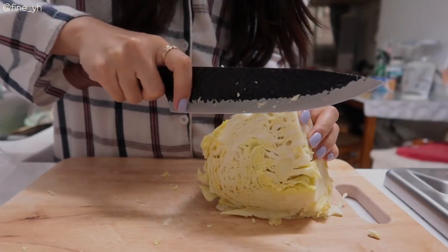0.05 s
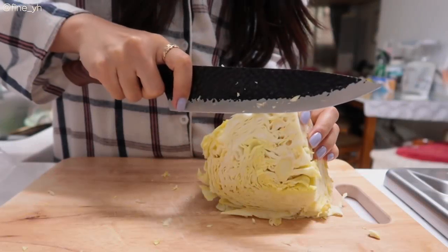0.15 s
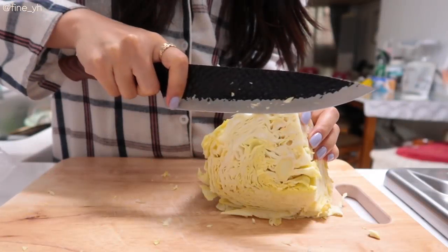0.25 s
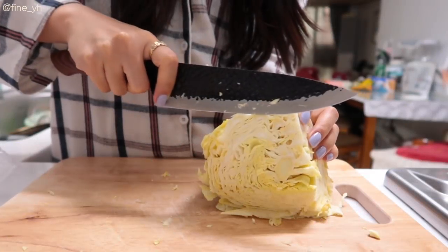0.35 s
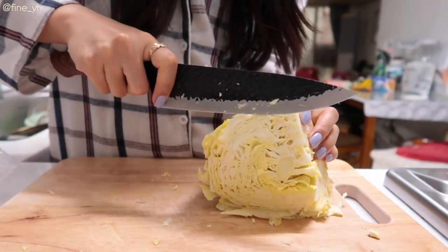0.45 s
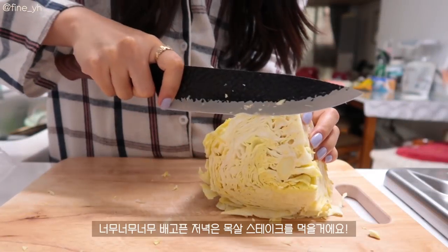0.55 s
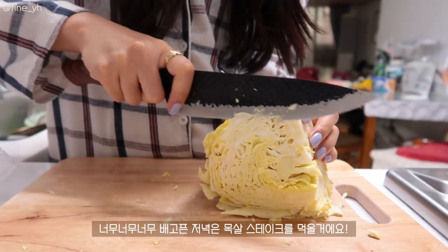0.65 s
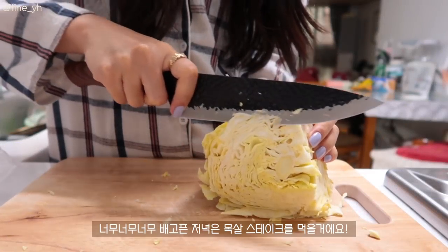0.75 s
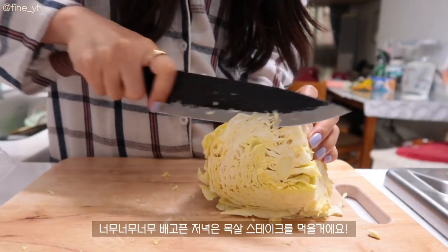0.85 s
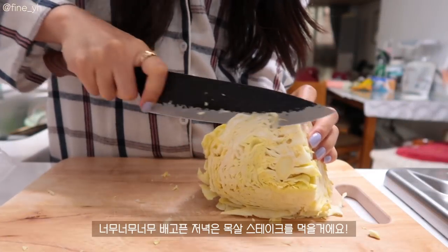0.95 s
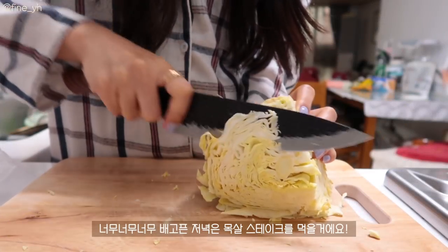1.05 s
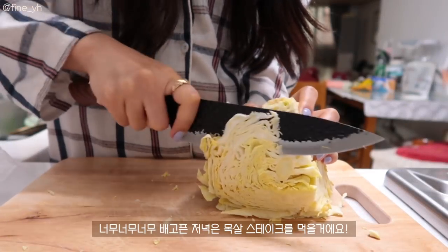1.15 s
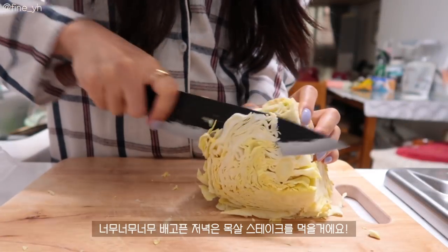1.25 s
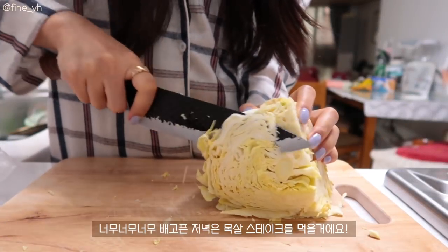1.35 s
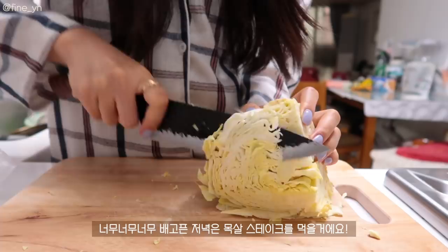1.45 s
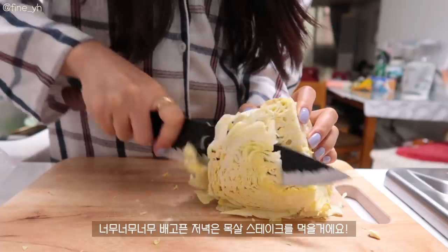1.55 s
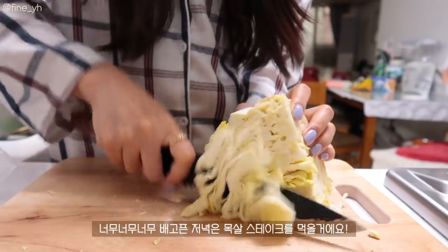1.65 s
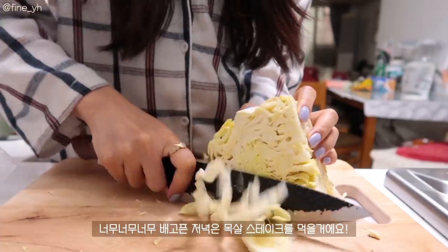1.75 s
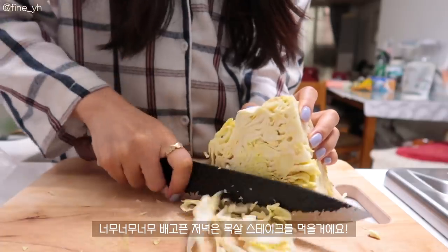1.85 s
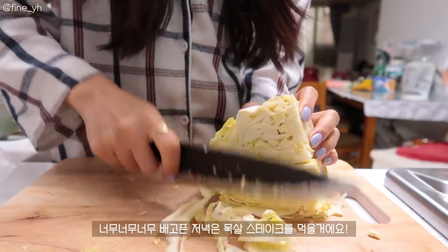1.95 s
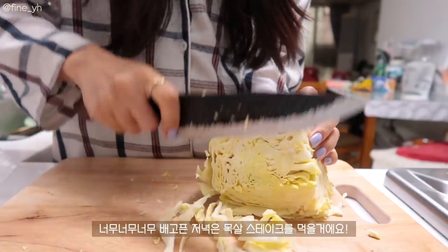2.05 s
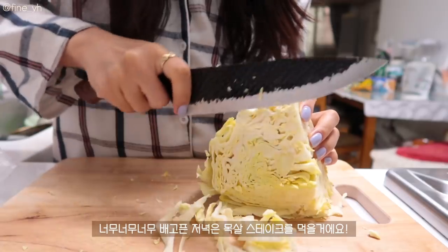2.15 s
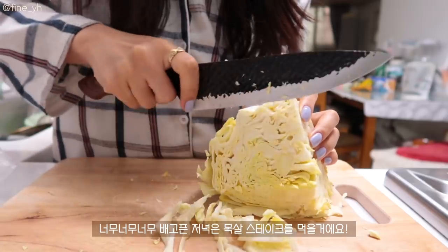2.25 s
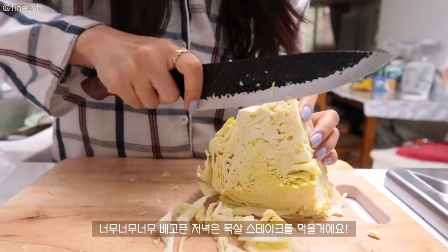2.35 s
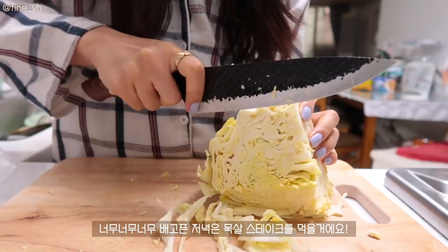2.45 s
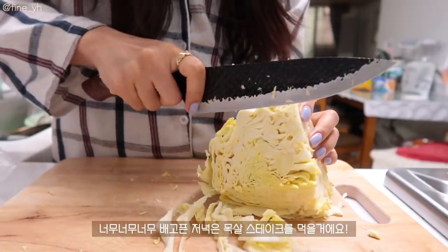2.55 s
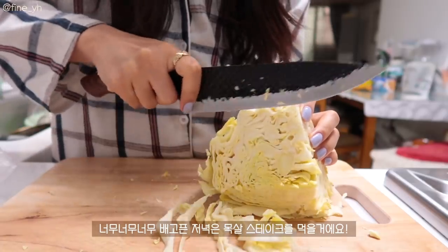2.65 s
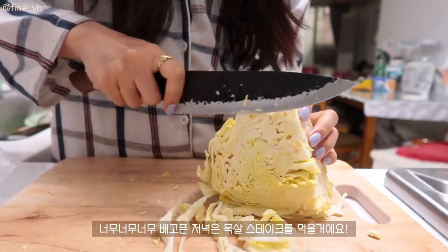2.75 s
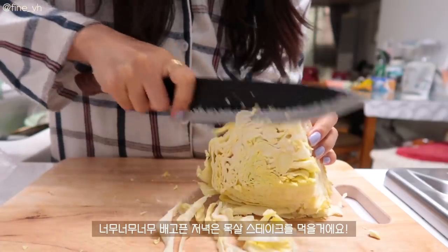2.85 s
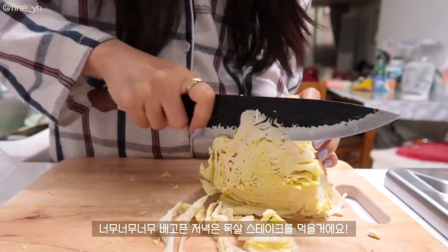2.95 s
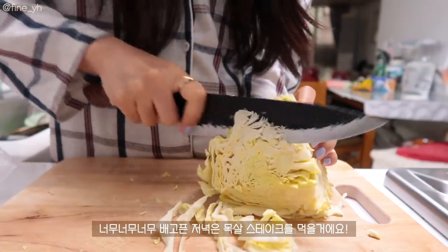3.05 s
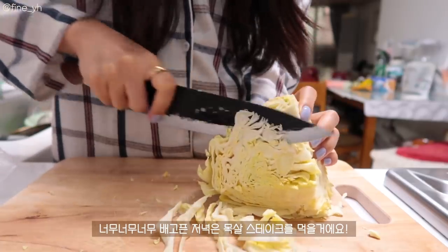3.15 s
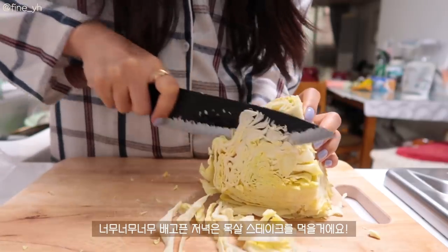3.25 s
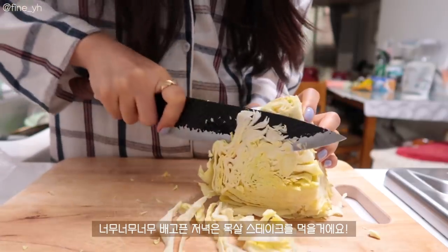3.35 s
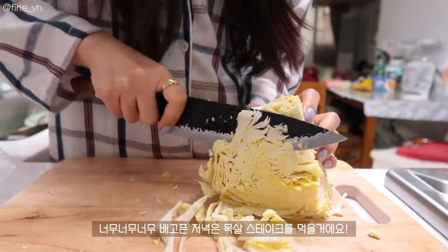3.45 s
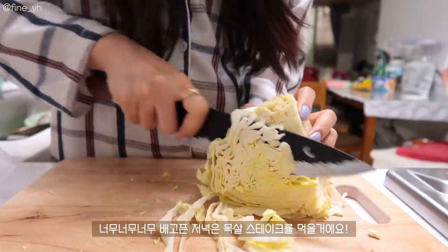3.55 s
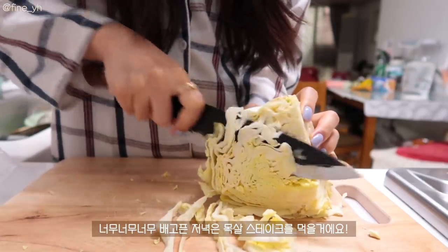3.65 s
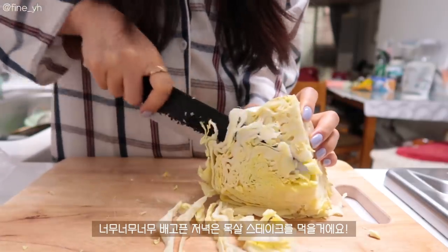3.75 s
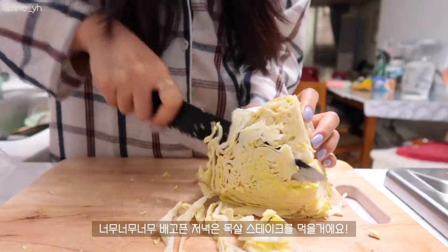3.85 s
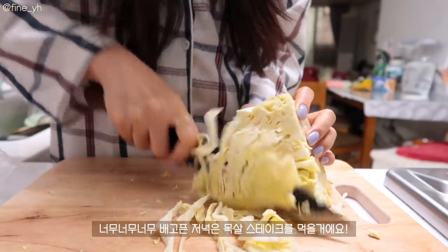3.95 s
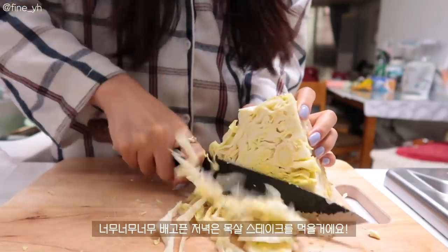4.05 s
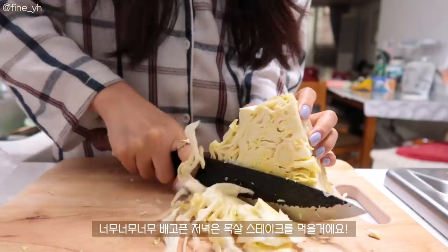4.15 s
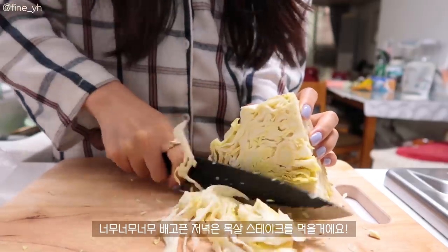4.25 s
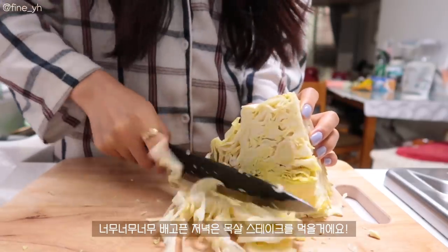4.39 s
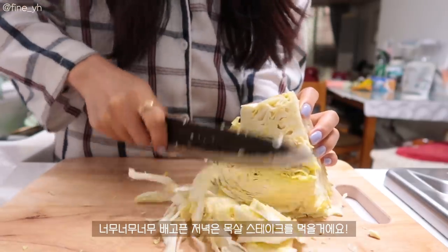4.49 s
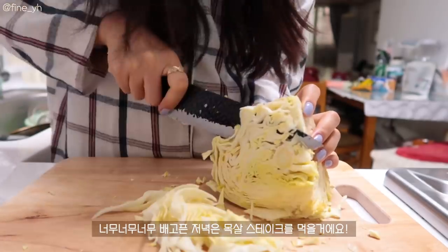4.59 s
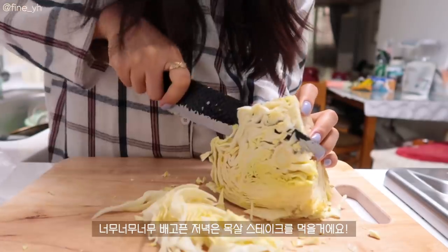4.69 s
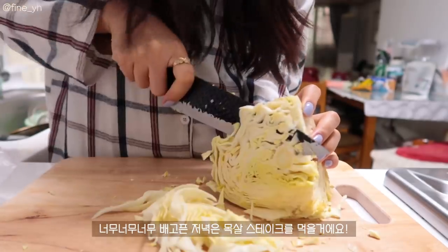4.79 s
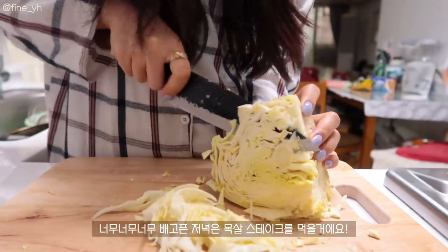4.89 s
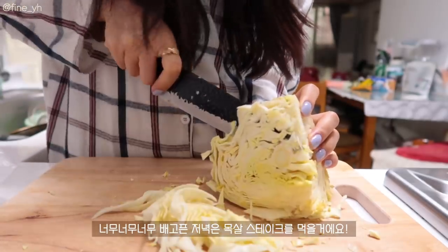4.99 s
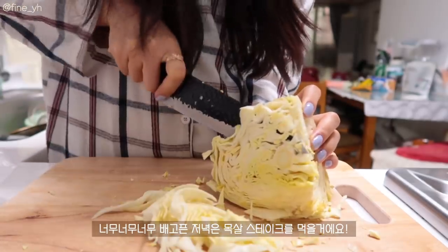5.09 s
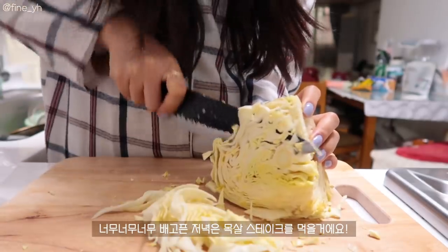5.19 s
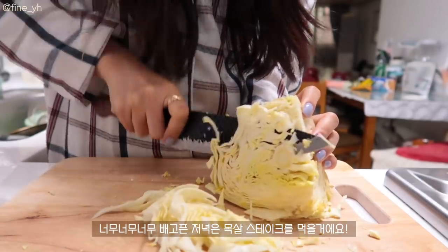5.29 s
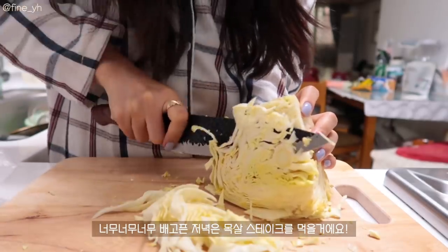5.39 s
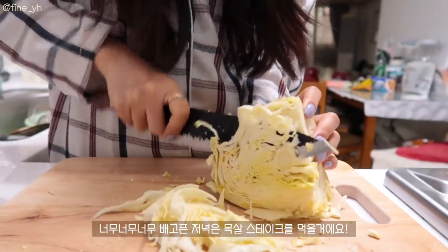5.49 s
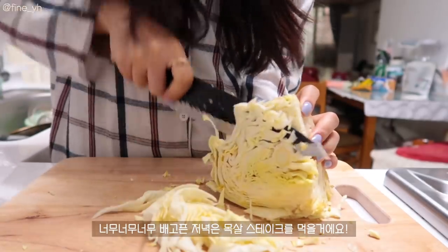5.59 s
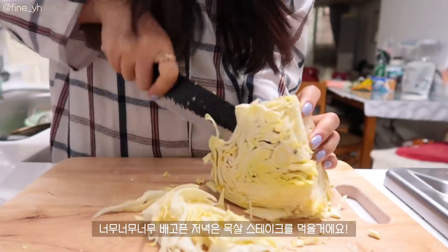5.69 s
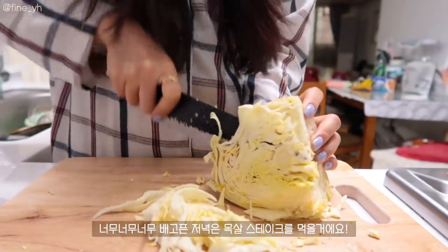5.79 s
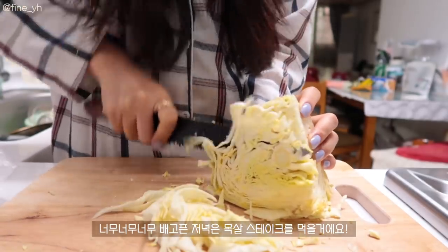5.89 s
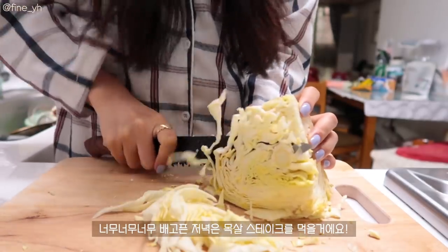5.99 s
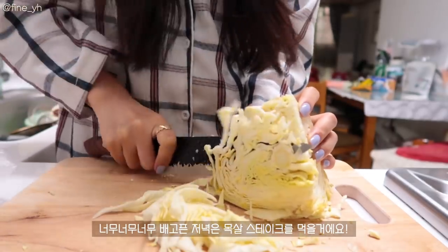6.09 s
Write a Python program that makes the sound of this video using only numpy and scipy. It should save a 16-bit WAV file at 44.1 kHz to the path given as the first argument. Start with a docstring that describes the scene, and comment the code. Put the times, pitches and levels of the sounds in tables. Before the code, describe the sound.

Crisp, irregular cabbage crunching recorded close in a small room. The blade slides and rasps, wet leaves squeak on steel, and thick ribs crack sharply. Two strokes finish with bright woody knocks, the first so strong it distorts. Later slices grind with a low stuttering throb through the board, ending on a weak tap. Quiet room rumble and fridge hum lie underneath.

```python
"""A chef's knife shreds half a cabbage on a wooden board, heard close up in a small kitchen.
Random bursts of fracture, coloured for leaf, blade, juice and board, make the crunch and the rasp.
Ribs snap, wet leaf squeaks on steel, and the giving leaves throb in the board as slow tones.
Three strokes end with the edge knocking on the wood, as decaying modes and noise; the first overloads
the microphone. Echoes and a short reverberation surround them, over room rumble and refrigerator hum."""
import sys
import numpy as np
from scipy import signal
from scipy.fft import rfft, irfft, next_fast_len
from scipy.io import wavfile
from scipy.ndimage import map_coordinates

SR = 44100
rng = np.random.default_rng(int(sys.argv[2]) if len(sys.argv) > 2 else 0)


def unload_wav(signal):
    """Save mono or channel-first audio to the path in sys.argv[1] as 16-bit WAV at rate SR, clipped to [-1, 1]."""
    wavfile.write(
        sys.argv[1],
        SR,
        np.round(np.clip(np.atleast_2d(signal).T, -1, 1) * 32767).astype(np.int16),
    )


N = 270333
TIME = np.arange(N) / SR


def amp(db):
    """Level and amplitude: 20 dB is a factor of ten in gain."""
    return 10 ** (np.asarray(db) / 20)


def unit(x):
    """Normalisation of mean power: the signal scaled to rms 1."""
    return x / np.sqrt(np.mean(x ** 2) + 1e-20)


def along(points, hz):
    """Logarithmic frequency scale: (f/Hz, value) points interpolated on it."""
    f, value = np.transpose(sorted(map(tuple, points)))
    return np.interp(np.log(hz + 1), np.log(f + 1), value)


def wobble(rate):
    """Band-limited fluctuation: a smooth curve through random knots, rate of them a second."""
    knots = rng.standard_normal(int(N * rate / SR) + 4)
    return map_coordinates(knots, [TIME * rate])


def add(track, s, sound):
    """Superposition: a sound is summed into the track from time s."""
    start = round(s * SR)
    track[..., start:start + sound.shape[-1]] += sound[..., :N - start]


def coloured(x, points, size=8192):
    """Minimum-phase filtering: the folded cepstrum gives a causal response, here of unit energy."""
    log_spectrum = np.log(amp(along(points, np.fft.rfftfreq(size, 1 / SR))))
    cepstrum = irfft(log_spectrum)
    cepstrum[1:size // 2] *= 2
    cepstrum[size // 2 + 1:] = 0
    response = irfft(np.exp(rfft(cepstrum)))
    response /= np.linalg.norm(response)
    return signal.fftconvolve(np.atleast_2d(x), response[None], axes=1)[:, :x.shape[-1]]


def spread(pair):
    """Interchannel coherence: two unrelated signals become left and right, alike in the bass."""
    # left-right correlation: f/Hz, correlation
    coherence = [(200, 0.98), (1000, 0.91), (2200, 0.98), (4000, .7), (6000, 0.5), (8000, .05),
                 (10500, -0.097), (14000, .1)]
    m = next_fast_len(pair.shape[1] + SR // 10)
    correlation = along(coherence, np.fft.rfftfreq(m, 1 / SR))
    turn = np.arccos(np.clip(correlation, -1, 1)) / 2
    mid, side = irfft(rfft(pair, m) * [np.cos(turn), np.sin(turn)], m)[:, :pair.shape[1]]
    return np.array([mid + side, mid - side])


def gesture(attack, length, db, swell_db):
    """Amplitude envelope of one movement: linear attack, swell even in dB, exponential release."""
    release_db_per_s = 400.5
    t = np.arange(SR + SR // 4) / SR
    swell = swell_db * np.minimum(t / length, 1)
    release = release_db_per_s * np.maximum(t - length, 0)
    return np.minimum(t / attack, 1) * amp(db + swell - release)


def effort():
    """Addition of power: pushes, drops and slides give the gains of crunch, rasp, fizz and board push."""
    # knife pushes through leaves, and cut shreds dropping softly: t/s, attack/s, length/s,
    # relative crunch level/dB, swell/dB over the movement, then over the crunch:
    # rasp/dB, juicy fizz/dB, push on the board/dB
    push_and_drop_rows = [(0.478, 0.01, .058, -45, 5, -0.5, -11, -14),
                          (0.629, 0.013, .12, -46, 12.5, 6.5, -7, -4),
                          (0.868, 0.023, 0.066, -49.5, 0, 8, -9, -6),
                          (1.02, 0.024, 0.093, -38.5, 8.5, 7.5, -2, -7.5),
                          (1.103, 0.01, .07, -28, -0.5, -1.5, -8, -7.5),
                          (1.23, 0.034, 0.019, -34, 2, 1.5, -6, -3.5),
                          (1.373, 0.02, 0.046, -43.5, -1, 2, -9, -2),
                          (1.424, 0.026, 0.14, -34, 8.5, 0.5, -7, -7.5),
                          (1.56, 0.013, 0.14, -31, 3.5, -1, -5.5, -2.5),
                          (1.924, 0.0073, .018, -57, -2, 1, -5, 6),
                          (2.546, .018, 0.034, -55.5, -1, -8, -24, -14),
                          (2.889, .022, 0.065, -34, 2, 7.5, -4.5, -4),
                          (2.948, 0.013, 0.068, -31.5, -3, 1, -9.5, -5.5),
                          (3.066, 0.02, 0.055, -39, -1.5, 3.5, -6, -2),
                          (3.217, .012, .022, -42, 1, 1, -9.5, -10),
                          (3.312, .007, .022, -30, -1.5, 1, -1, -7),
                          (3.345, 0.03, 0.038, -32, 5, -3, -13, -4.5),
                          (3.526, 0.02, .03, -32, 1, 0.5, -6.5, 1),
                          (3.553, 0.016, .074, -29.5, 6, -1, -6, -8),
                          (3.68, 0.0072, 0.021, -38.5, -0.5, 0.5, -2, -0.5),
                          (3.807, 0.012, 0.025, -44, 0.5, 7.5, 0, 3),
                          (3.866, 0.019, 0.11, -39.5, 9.5, 2, -2, -5),
                          (3.936, 0.055, 0.11, -21, -1.5, -6, -11, -5.5),
                          (4.067, .01, 0.048, -33, -3.5, -21, -15.5, -2.5),
                          (4.556, 0.035, 0.1, -37.5, -1, 1, -8, -3),
                          (4.742, 0.0048, .05, -35.5, -5.5, 0, -3.5, -2),
                          (5.099, .01, 0.111, -36.5, 4, -5.5, -13.5, -4),
                          (5.209, 0.029, 0.073, -30, 2.5, -3.5, -6, -4),
                          (5.265, 0.028, 0.11, -26.5, 5, -7.5, -15.5, -9.5),
                          (5.533, .014, .068, -35, -0.5, -0.5, -7.5, -3.5),
                          (5.749, 0.0088, 0.0074, -50, 3.5, 0, -13, -7),
                          (5.803, .05, .268, -32, 4, -5, -10.5, -5.5)]
    # the blade sliding lightly along the cabbage: t/s, length/s, relative crunch level/dB,
    # then over the crunch: rasp/dB, juicy fizz/dB
    slide_rows = [(0, 0.098, -69.5, 12.5, -14), (0.208, 0.26, -57.5, 8, -7), (.485, .29, -46.5, 5.5, -6.5),
                  (0.792, 0.21, -47, 8, -4.5), (1.0, 0.45, -48, 2, -6), (1.918, 0.085, -62.5, 0.5, -12),
                  (2.58, 0.12, -64.5, 0.5, -5.5), (2.677, .17, -50.5, 6, -7), (2.839, .45, -45.5, 1, -4),
                  (3.264, 0.11, -37.5, 2, -9.5), (3.4, 0.16, -55.5, -3, -6), (3.65, 0.33, -47, -0.5, -1),
                  (4.106, 0.445, -52, 1, -8.5), (4.539, 0.29, -50.5, -2, -12.5),
                  (4.854, 0.17, -45, -1, -7.5), (5.018, .09, -50.5, -2, -9.5), (5.36, 0.067, -39, 2, -15),
                  (5.44, 0.12, -51.5, -7, -13), (5.566, 0.12, -47, -1, -7), (5.658, 0.17, -59, -2, -1.5)]
    slide_attack_s, slide_board_db, slide_waver_db = 0.059, -2.5, 1.5
    pushing, sliding = np.zeros((2, 4, N))
    for s, attack, length, db, swell_db, rasp_db, fizz_db, board_db in push_and_drop_rows:
        gains = amp([0, rasp_db, fizz_db, board_db])
        add(pushing, s, np.outer(gains, gesture(attack, length, db, swell_db)) ** 2)
    for s, length, db, rasp_db, fizz_db in slide_rows:
        gains = amp([0, rasp_db, fizz_db, slide_board_db])
        add(sliding, s, np.outer(gains, gesture(slide_attack_s, length, db, 0)) ** 2)
    uneven_drag = amp(slide_waver_db * wobble(70))
    return np.sqrt(pushing + sliding * uneven_drag ** 2)


def bursts(rate, scatter_db, clump_db, hiss):
    """Shot noise: cells burst at random in clumps, rate a second, over sliding hiss; rms 1."""
    sizes = amp(scatter_db * np.minimum(rng.standard_normal(N), 1))
    sizes = sizes * (rng.random(N) < rate / SR)
    pops = unit(sizes * rng.choice([-1, 1], (2, N)))
    clumps = amp(clump_db * np.tanh(wobble(220)))
    return unit(spread((pops + hiss * rng.standard_normal((2, N))) * clumps))


def cutting(crunch, rasp, fizz, push, throb, pulse_db=2.0):
    """Source and filter: fracture noise is shaped by the leaves, blade, juice and board."""
    # spectra of leaves, blade, juice and board: f/Hz, relative level/dB
    leaf_colour = [(60, -37.5), (250, -17), (450, -0.5), (650, -5), (900, -1.5), (1400, 4), (2000, -4.5),
                   (2700, -6.5), (4200, -8.5), (6000, -15.5), (10000, -31), (16000, -56.5)]
    blade_colour = [(500, -50.5), (1500, -21), (2200, -2), (2500, -2), (2950, -1.5), (3300, -2),
                    (3900, -7.5), (5000, -19), (7000, -25), (16000, -50)]
    juice_colour = [(1000, -36.5), (3000, -4), (4500, 5.5), (6000, 2.5), (7500, 0.5), (10000, 0.5),
                    (12300, -1), (14000, -7), (15500, -15.5)]
    board_colour = [(15, -24), (35, 6), (55, 3), (85, 3), (140, 0.5), (200, -3.5), (280, -11.5), (400, -4),
                    (480, -10.5), (600, -19), (1500, -48), (4000, -78.5)]
    cells = bursts(rate=2000, scatter_db=2.5, clump_db=2.5, hiss=0.48)
    spray = bursts(rate=8700, scatter_db=0.5, clump_db=3.0, hiss=1.0)
    scrape = bursts(rate=2400, scatter_db=2.0, clump_db=5.0, hiss=0.35)
    leaves = coloured(cells * crunch * amp(-4.5), leaf_colour)
    blade = coloured(scrape * rasp * amp(-5.0), blade_colour)
    juice = coloured((0.5 * cells + 0.99 * spray) * fizz * amp(1.0), juice_colour)
    board = coloured(cells * push * amp(1.5), board_colour)
    # fractures crowd into the moment at which each leaf gives way
    pulse = amp(-pulse_db * np.tanh(10 * throb))
    return (leaves + blade + juice + board) * pulse


def thin_ribs(crunch):
    """Poisson process: thin ribs break at random, (t/s, crack/dB, body/dB), louder with more crunch."""
    ribs_per_s, rib_db, scatter_db, body_db = 30, -1, 1, -7
    growth = 0.76  # dB of crack per dB of crunch: ribs stand out more under a light touch
    chance, size = rng.random(N), rng.standard_normal(N)
    crunch_db = 20 * np.log10(crunch + 1e-9)
    crack_db = growth * crunch_db + rib_db + scatter_db * size
    return [(i / SR, crack_db[i], body_db) for i in np.flatnonzero(chance < ribs_per_s / SR)]


def snaps(crunch, snap_t60=0.012, tap_t60=0.01):
    """Brittle fracture: a rib's sudden release is a short bright crack and a duller knock."""
    # thick ribs snapping and light taps: t/s, relative crack level/dB, body over the crack/dB
    thick_ribs = [(.2623, -28, -41), (.4189, -23.5, -16), (.5182, -21, -17.5), (.5611, -19, -13),
                  (.6744, -20, -8), (.8016, -27, -2), (.8629, -28, -30), (1.0106, -24, -8),
                  (1.1757, -9, -17.5), (2.1964, -49, -5), (2.568, -47.5, -4), (2.9108, -7.5, -28),
                  (3.2181, -20.5, -23), (3.276, -27, -23), (3.3179, -10, -25), (3.4765, -25.5, -34),
                  (3.5079, -27, -20), (3.5299, -24, -10), (3.5448, -19, 0), (4.37, -29.5, -21),
                  (4.4714, -29.5, -14.5), (4.5451, -32, -3.5), (4.6209, -16, -18), (4.7506, -27, -28),
                  (5.3453, -15, -5.5), (5.3712, -11, -11), (5.3924, -18, -1), (5.4261, -19.5, -12.5),
                  (5.5079, -26, -4.5), (5.5488, -22.5, -1.5), (5.8153, -38.5, 11), (5.9608, -16, -1),
                  (6.0121, -11, -7.5), (6.0492, -15, -18)]
    # spectra of crack and knock: f/Hz, relative level/dB
    snap_colour = [(300, -32), (1200, -8), (2500, 5.5), (4000, -5), (7000, -12), (12500, -21.5),
                   (16000, -29.5)]
    tap_colour = [(60, -25), (150, -9.5), (400, 3.5), (620, 0.5), (900, -0.5), (1400, 2.5), (2200, -17),
                  (6000, -33)]
    cracks, knocks, t = np.zeros(N), np.zeros(N), np.arange(SR // 20) / SR
    for s, db, body_db in list(thick_ribs) + thin_ribs(crunch):
        add(cracks, s, amp(db - 10 - 60 * t / snap_t60))
        add(knocks, s, amp(db + body_db - 2 - 60 * t / tap_t60))

    def grain(envelope):
        """Noise modulation: random signs under an envelope, spread to left and right."""
        return spread(envelope * rng.choice([-1, 1], (2, N)))

    return coloured(grain(cracks), snap_colour) + coloured(grain(knocks), tap_colour)


def resonant(x):
    """Resonance: each mode of the blade pressed into the wedge lifts a narrow band."""
    # blade modes: f/Hz, width/Hz, lift/dB
    wedge_modes = [(847, 70, 5), (966, 99, 7.5), (1121, 140, 3), (1337, 110, 5.5), (1540, 88, 4.5),
                   (1807, 110, 6.5), (2022, 85, 8.5), (2380, 190, 3.5), (2650, 110, 2.5), (2900, 90, 1.5),
                   (2975, 88, 4.5), (3874, 69, 6), (4220, 80, 3.5), (5590, 550, 3), (6540, 78, 2.5),
                   (12410, 550, 1)]
    m = next_fast_len(N + SR // 4)
    f = np.fft.rfftfreq(m, 1 / SR)
    response = np.ones(len(f), complex)
    for hz, width, db in wedge_modes:
        damping = 1j * f * width
        response += (amp(db) - 1) * damping / (hz * hz - f * f + damping)
    return irfft(rfft(x, m) * response, m)[:, :N]


def slips(rows, jitter, rate, flutter_db):
    """Stick-slip oscillation: short swelling tones whose frequency and level waver."""
    out, drift, flutter = np.zeros(N), wobble(rate), amp(flutter_db * wobble(rate))
    for s, length, hz, db in rows:
        t = np.arange(int(length * SR))
        unsteady_hz = hz * (1 + jitter * drift[round(s * SR) + t])
        phase = 2 * np.pi * np.cumsum(unsteady_hz) / SR
        swell = np.sin(np.pi * t / len(t))
        add(out, s, amp(db) * np.sqrt(2) * swell * np.sin(phase))
    return out * flutter


def squeaks():
    """Friction-driven oscillation: wet leaf sticks and slips on steel."""
    # squeaks: t/s, length/s, mean f/Hz, level before flutter/dB
    squeak_rows = [(.56, 0.034, 2800, -37), (.7, 0.065, 2926, -28.5), (.81, 0.16, 2830, -43),
                   (.855, 0.054, 2800, -33.5), (1.255, 0.016, 2023, -35), (1.38, 0.024, 2100, -38),
                   (1.505, 0.024, 940, -27.5), (2.895, 0.039, 2886, -27.5)]
    return slips(squeak_rows, jitter=0.067, rate=720, flutter_db=5.5)


def rocking():
    """Low-frequency oscillation: the wedge rocks unsteadily on the board."""
    # rocking tones: t/s, length/s, mean f/Hz, level before flutter/dB
    rock_rows = [(1.04, 0.18, 75.5, -35.5), (1.48, 0.37, 76.4, -29.5), (2.89, 0.089, 67, -30),
                 (3.31, 0.077, 71.6, -38), (3.53, 0.14, 94.3, -34), (3.9, 0.15, 92, -28.5),
                 (4.58, 0.12, 57.8, -38.5), (4.735, 0.092, 68.7, -35.5)]
    return slips(rock_rows, jitter=0.25, rate=60, flutter_db=2.5)


def throbs():
    """Periodic forcing: each leaf resists, then gives, rocking the board as leaves pass the edge."""
    # steady pushes: t/s, length/s, first rate/Hz, last rate/Hz, level before flutter/dB, swell/dB
    throb_rows = [(5.13, .148, 60, 88, -30, 13), (5.34, 0.078, 96, 84, -21, -3),
                  (5.849, 0.2275, 79, 105, -25.5, 6.5)]
    fade_s = 0.019
    out, drift, flutter = np.zeros(N), 1 + 0.044 * wobble(50), amp(0.51 * wobble(49))
    for s, length, first_hz, last_hz, db, swell_db in throb_rows:
        done = np.clip((TIME - s) / length, 0, 1)
        leaf_hz = (first_hz + (last_hz - first_hz) * done) * drift
        phase = 2 * np.pi * np.cumsum(leaf_hz) / SR
        gate = np.clip(np.minimum(done, 1 - done) * length / fade_s, 0, 1)
        tone = np.sin(phase) + 0.11 * np.sin(2 * phase)
        out += gate * amp(db + swell_db * done) * np.sqrt(2) * tone
    return out * flutter


def chops(crack_t60=0.026, thump_t60=0.15, ring_t60=0.13):
    """Impulse excitation: the edge cracks on wood, rings modes and after-ring, thumps the counter."""
    # the edge landing on the wood: t/s, then relative levels of modes/dB, crack/dB, thump/dB, ring/dB,
    # ring of the struck spot f/Hz, ring width/octaves
    chop_rows = [(1.719, 1, 5, -11, -12.5, 1442, 0.72), (4.0471, -3, -4, -13.5, -17, 1372, 0.62),
                 (6.077, -18.5, -10.5, -24, -19, 973, .15)]
    # board and blade ringing together: f/Hz, relative level/dB, t60/s
    board_modes = [(136, -19, 0.11), (181, -20.5, 0.22), (254, -19.5, 0.05), (355, -14.5, .1),
                   (850, -12, 0.017), (968, -14.5, 0.06), (1365, -2.5, 0.066), (1534, -1.5, 0.044),
                   (1940, -6, 0.059), (2037, -7.5, 0.034), (2340, -13, 0.042), (2686, -8.5, .025),
                   (3370, -23, 0.023), (4060, -18, 0.029), (4600, -8.5, 0.045), (5080, -13, 0.035)]
    # spectra of crack and thump: f/Hz, relative level/dB
    crack_colour = [(100, -15), (400, -3.5), (1400, 5), (2400, -4), (3100, -6), (5000, -15), (7000, -21),
                    (15000, -33.5)]
    thump_colour = [(20, -28), (60, -11), (130, 3), (200, 2.5), (280, -6), (370, 0.5), (480, -15.5),
                    (600, -13), (1500, -34), (4000, -71.5)]
    # spectrum of the after-ring: offset from its centre/ring widths, relative level/dB
    ring_shape = [(-3.5, -32), (-2.5, -11), (-1.9, -3), (0.4, -4), (0.55, -2), (2.1, -16), (0.5, -28),
                  (4, -57)]
    out, t = np.zeros((2, N)), np.arange(SR // 2) / SR
    hz, mode_db, t60 = np.transpose(board_modes)[:, :, None]
    modes = amp(-60 * t / t60) * np.sin(2 * np.pi * hz * t)

    def dying(life):
        """Exponential decay: random signs fall by 60 dB in one life."""
        return amp(-60 * t / life) * rng.choice([-1, 1], (2, len(t)))

    for s, db, crack_db, thump_db, ring_db, spot_hz, octaves in chop_rows:
        strength = amp(mode_db + rng.standard_normal(hz.shape))
        strength[1::2] *= -1  # neighbouring modes swing in opposite directions
        ring = [(spot_hz * 2 ** (offset * octaves), level) for offset, level in ring_shape]
        add(out, s, amp(db - 3.5) * np.sum(strength * modes, axis=0))
        add(out, s, amp(crack_db) * coloured(spread(dying(crack_t60)), crack_colour))
        add(out, s, amp(thump_db) * coloured(dying(thump_t60)[0], thump_colour))
        add(out, s, amp(ring_db) * coloured(spread(dying(ring_t60)), ring))
    return out


def echoes(near):
    """Specular reflection: nearby surfaces return delayed, weaker copies."""
    # reflections: delay/s, gain
    reflections = [(.00255, 0.082), (.00331, 0.09), (.00377, 0.063), (.0062, .08), (.008, 0.03)]
    out = np.zeros((2, N))
    for delay, gain in reflections:
        add(out, delay, gain * near)
    return out


def kitchen(x):
    """Reverberation: the walls answer with noise whose decay time depends on frequency."""
    # reverberation time: f/Hz, t60/s
    decay_times = [(100, 0.66), (350, 0.23), (800, .35), (2000, .37), (4000, 0.23), (12000, 0.28)]
    hz, t, noise = signal.stft(rng.standard_normal((2, SR // 2)), SR, nperseg=256)
    decay = amp(-60 * t / along(decay_times, hz)[:, None])
    tail = spread(signal.istft(noise * decay, SR, nperseg=256)[1])
    # the answer starts 5 ms late
    tail = np.pad(tail / np.linalg.norm(tail[0]), ((0, 0), (SR // 200, 0)))
    return signal.fftconvolve(x, tail, axes=1)[:, :N]


def air():
    """Stationary noise and tones: filtered noise is the room's rumble, sines a refrigerator's hum."""
    # refrigerator tones: f/Hz, rms level/dB
    hum_tones = [(59.5, -56), (141, -66.5), (180, -68.5)]
    # room rumble: t/s, level/dB
    rumble_levels = [(0, -48), (.7, -53), (1.9, -58), (2.5, -55.5), (4.3, -53), (6.13, -44.5)]
    # spectrum of the rumble: f/Hz, relative level/dB
    rumble_colour = [(15, -30.5), (25, -17.5), (45, -3), (70, -7), (90, -12), (140, -5.5), (240, -11),
                     (320, -11.5), (500, -21), (1600, -28), (11000, -43), (15000, -57.5)]
    hum = np.zeros(N)
    for hz, db in hum_tones:
        hum += amp(db) * np.sqrt(2) * np.sin(2 * np.pi * hz * TIME + 0.34 * wobble(2.3))
    rumble = unit(coloured(spread(rng.standard_normal((2, N))), rumble_colour))
    return hum + amp(np.interp(TIME, *np.transpose(rumble_levels))) * rumble


def scene():
    """Superposition at the microphone: knife, cabbage and board, with the room's answer."""
    throb, knocks = throbs(), chops()
    crunch, rasp, fizz, push = effort()
    cut = cutting(crunch, rasp, fizz, push, throb) + snaps(crunch)
    cabbage = resonant(cut) + squeaks()
    near = cabbage + knocks
    # the knocks are sent to the walls more weakly than the cutting sounds
    walls = kitchen(amp(-15.0) * cabbage + amp(-19.0) * knocks)
    return near + throb + rocking() + echoes(near) + walls + air()


def record(dry):
    """Clipping and band limitation: peaks flatten at full scale, then the highest treble is cut."""
    top_hz = 15600
    clipped = np.clip(dry, -1, 1)
    m = next_fast_len(N + SR // 2)
    passed = np.fft.rfftfreq(m, 1 / SR) < top_hz
    return irfft(rfft(clipped, m) * passed, m)[:, :N]


dry = scene()
out = record(dry)
unload_wav(out)
```